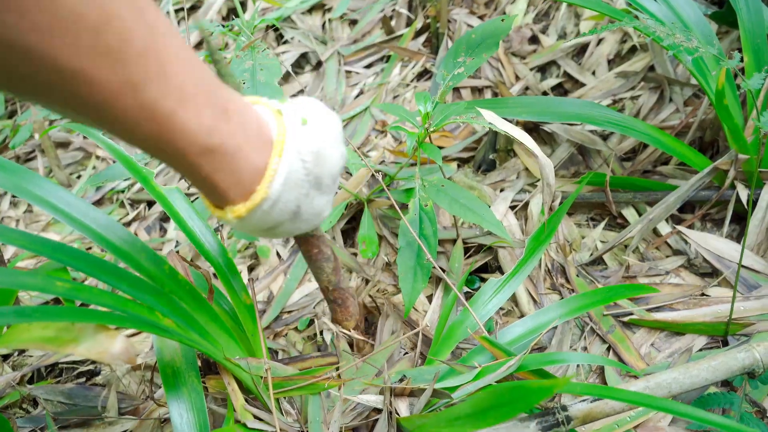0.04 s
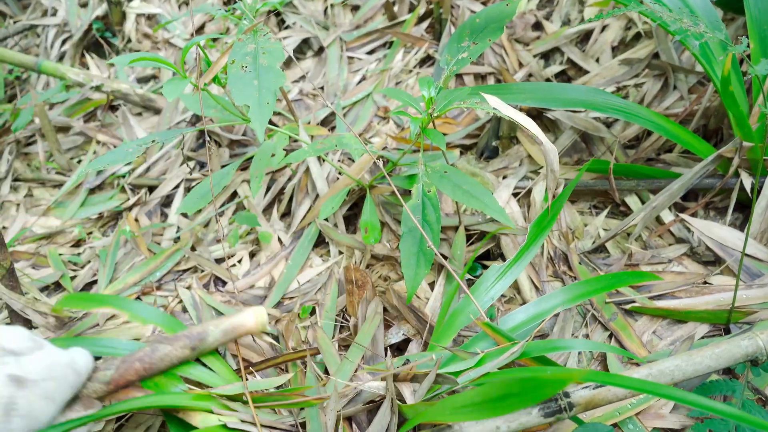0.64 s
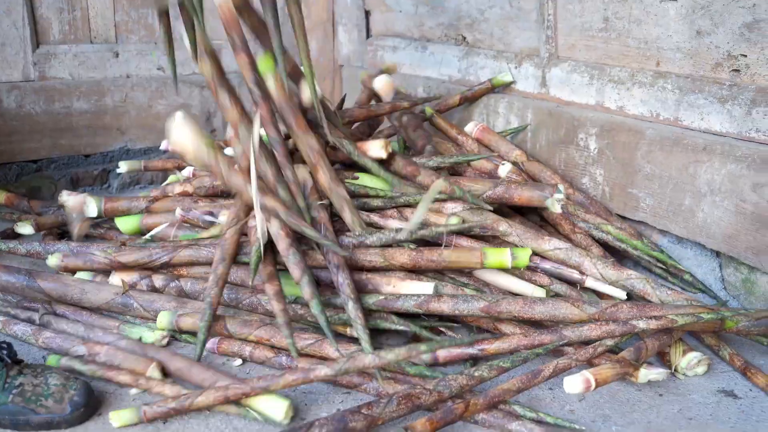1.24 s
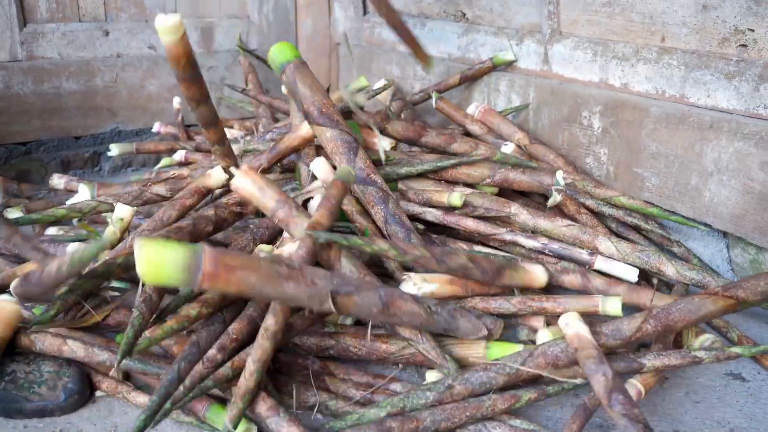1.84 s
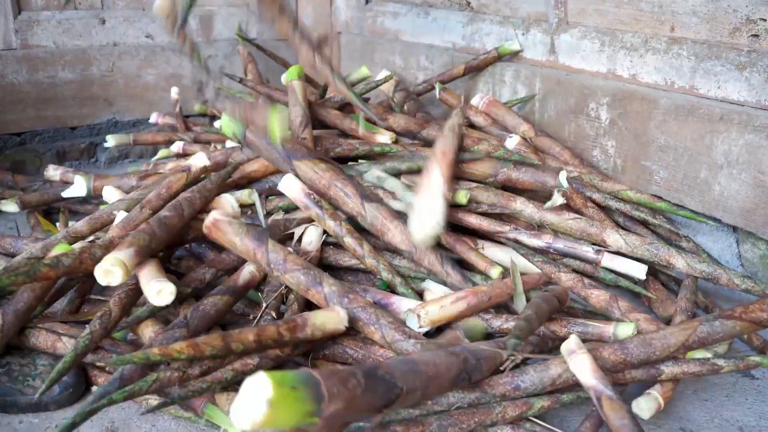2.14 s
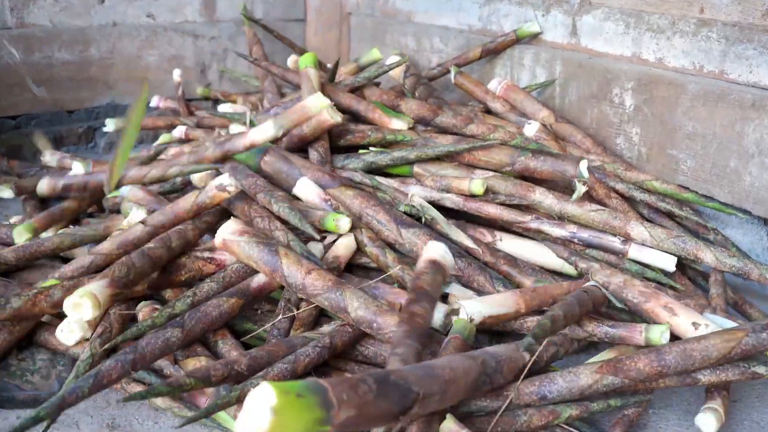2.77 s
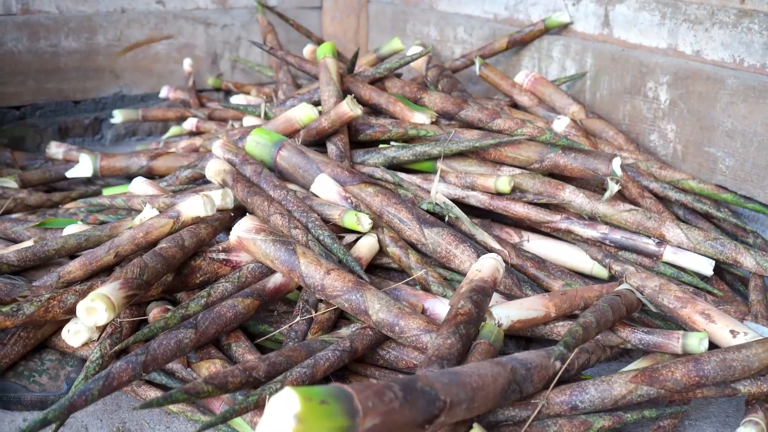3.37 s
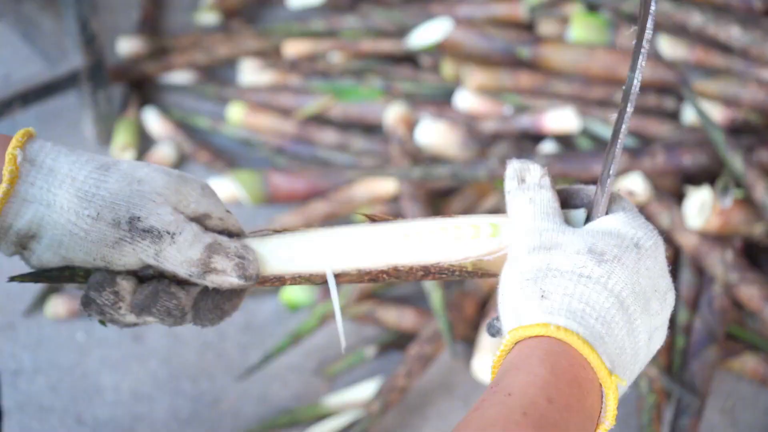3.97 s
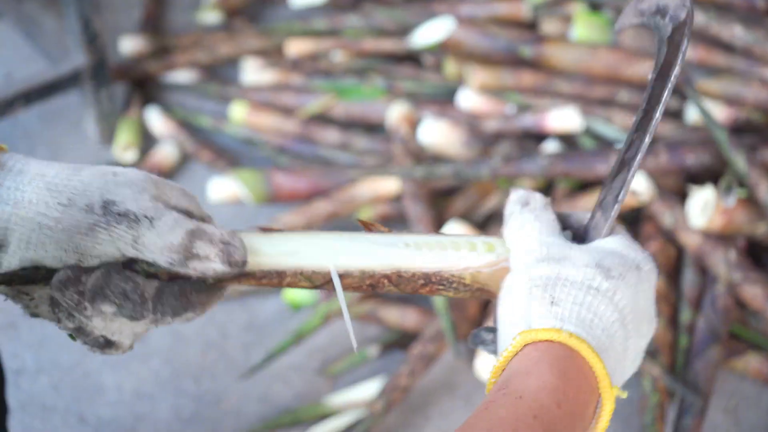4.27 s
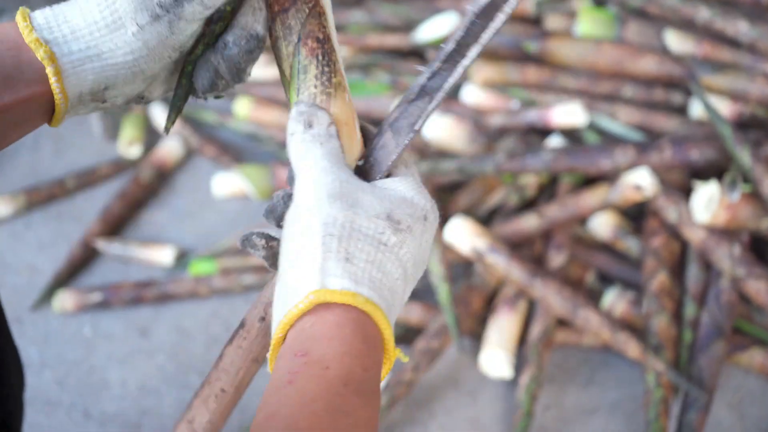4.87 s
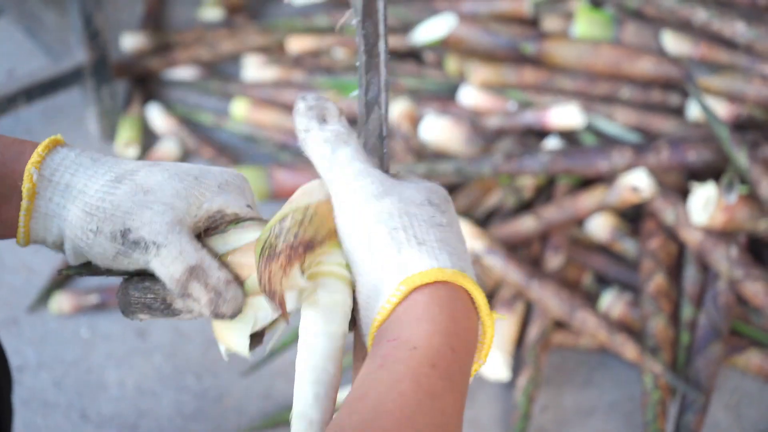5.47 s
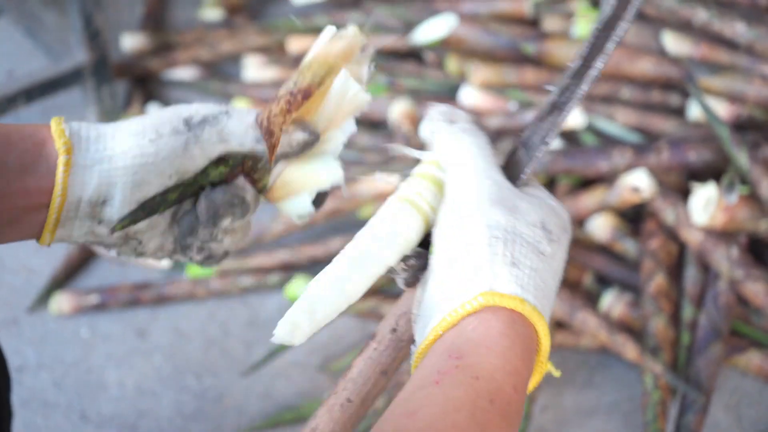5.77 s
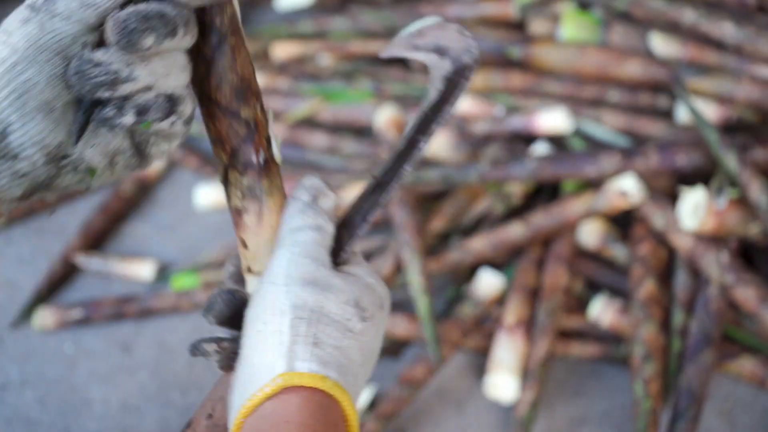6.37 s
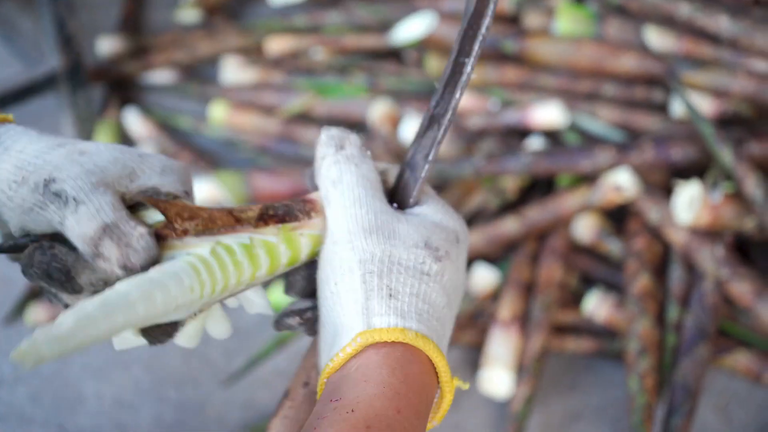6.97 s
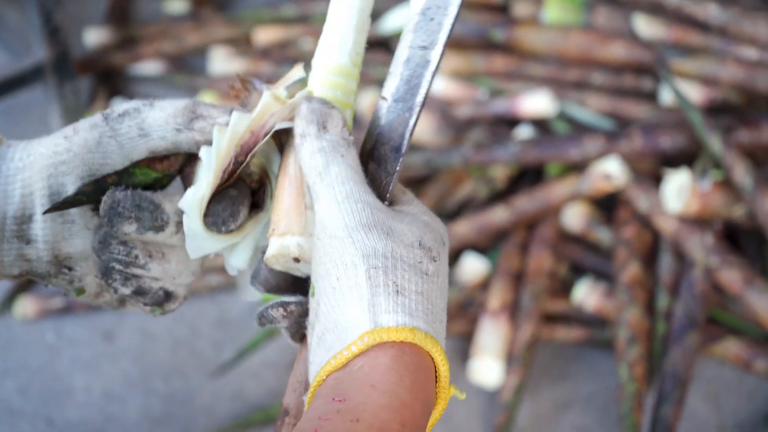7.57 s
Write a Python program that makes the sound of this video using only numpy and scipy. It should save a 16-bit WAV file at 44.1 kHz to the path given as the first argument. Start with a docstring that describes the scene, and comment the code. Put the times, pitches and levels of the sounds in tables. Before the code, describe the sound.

Close to the microphone outdoors, a young bamboo shoot cracks fibre by fibre, snaps free and brushes through dry leaves. Armfuls of shoots then tumble onto a pile with hollow knocks and rustling husks, settling into a few small clacks. Gloved hands then peel two shoots in turn, with dense sharp cracks, ripping and juicy crunches. Insects shrill faintly far away and air rumbles softly on the microphone.

```python
"""In a bamboo patch and a walled yard, shoots are harvested close to a mono microphone.
One is snapped off and brushes through dry leaves (0-1 s). Armfuls tumble onto a pile, hollow stems
knocking and husks rustling (1-4 s). Then gloved hands split the sheaths (the outer wrapping) and
rip them off, fibre by fibre. Insects shrill far away and moving air sways at the microphone."""
import sys
import numpy as np
from scipy import signal
from scipy.fft import rfft, irfft, next_fast_len
from scipy.io import wavfile
from scipy.ndimage import uniform_filter1d, map_coordinates

SR = 44100
rng = np.random.default_rng(int(sys.argv[2]) if len(sys.argv) > 2 else 0)


def persist_wave(psi):
    """Save psi, clipped to +-1, as 16-bit WAV."""
    counts = np.round(np.clip(psi, -1, 1) * 32767).astype(np.int16)
    wavfile.write(sys.argv[1], SR, np.atleast_2d(counts).T)


N = 340011

# How loud the insect chorus and the moving air are over time: time_s, level_db
CHORUS_LEVELS = [(1, -54), (2.9, -46.5), (3.97, -45.5), (3.99, -35.5), (4.3, -35.5), (5.55, -38.5),
                 (5.8, -37.5), (6.04, -37.5), (6.09, -39), (6.6, -37), (7.35, -42), (7.71, -41)]
AIR_LEVELS = [(0, -35.5), (6.3, -39), (7.71, -46)]
# A lower-pitched insect joins in: start_s, length_s
INSECT_CALLS = [(3.97, 0.21), (6.055, 0.11)]

# The shoot cracks at its foot: start_s, crack_db, flesh_db
SNAPS = [(0.0243, -21, -36), (0.0507, -14.5, -28), (0.1235, -22, -28.5), (0.1266, -8, -36),
         (0.1471, -13.5, -37), (0.1869, -17, -28), (0.1952, -13, -24), (0.2172, -18, -26.5),
         (0.2372, -11.5, -24.5), (0.251, -19, -32), (0.2613, -6, -17), (0.3302, -15.5, -38),
         (0.3448, -15, -23), (0.3507, -10, -26), (0.3595, -17.5, -25.5), (0.3708, -17, -40),
         (0.3777, -14.5, -21), (0.4115, -14, -24), (0.4175, -7.5, -14), (0.4551, -13, -21),
         (0.4795, -30, -17.5)]
# It brushes through dead leaves: start_s, length_s, crackle_db, crunch_db
BRUSHES = [(0.0, 0.05, -32.5, -36.5), (0.12, 0.24, -39.5, -43.5), (0.29, 0.075, -27, -45),
           (0.455, 0.037, -22.5, -32), (0.55, 0.38, -34, -38.5)]

# Armfuls pour onto the pile, and a few shoots slip: start_s, length_s, rustle_db, tumble_db
POURS = [(1.04, 0.27, -25.5, -27), (1.38, 0.28, -25, -28), (2.16, 0.19, -28.5, -29.5),
         (2.58, 0.016, -34, -31)]
SLIPS = [(0.975, 0.069, -32, -42), (1.935, 0.072, -31.5, -34), (2.04, 0.11, -30.5, -36.5),
         (3.048, 0.014, -37, -34), (3.66, 0.069, -40, -41.5), (3.762, 0.063, -37, -39)]
# Heavy shoots land: start_s, blow_db, ring_db, pitch_hz
KNOCKS = [(1.054, -30.5, -25, 2120), (1.089, -31, -20, 1300), (1.169, -31, -23.5, 2390),
          (1.252, -31.5, -26, 1510), (1.416, -28.5, -31, 970), (1.716, -31, -22.5, 2320),
          (1.844, -31.5, -42, 3460), (2.116, -29, -31, 2100), (2.173, -28, -45, 805),
          (2.204, -32, -31, 494), (2.228, -27.5, -31, 3040), (2.316, -30, -31, 920),
          (2.339, -28, -38, 1340), (2.46, -30, -28, 520), (2.68, -35, -40, 830), (2.772, -44, -48, 700),
          (2.95, -50, -43, 1200), (3.051, -33, -31, 895), (3.062, -31.5, -37, 1910),
          (3.152, -46, -50, 2470), (3.268, -44.5, -44, 4360), (3.395, -49.5, -50, 3900),
          (3.519, -54.5, -59, 395), (3.705, -41, -40, 700), (3.776, -34.5, -32, 564)]
# Hollow stems scrape down the pile and sing: start_s, length_s, level_db, pitch_hz
SCRAPES = [(1.082, .08, -23.5, 1320), (1.13, .13, -26, 1370)]

# A sheath splits: start_s, crack_db, flesh_db
SPLITS = [(4.2532, -29, -32.5), (4.32, -20.5, -33), (4.4507, -20, -36), (4.4664, -25, -46),
          (4.4953, -21, -37), (4.5435, -15.5, -15), (4.5504, -22, -24), (4.5727, -24, -13),
          (4.5961, -23, -27), (4.6221, -15, -22), (4.6334, -17, -33), (4.6423, -9, -16), (4.7299, -22, -47),
          (4.8092, -22, -18), (4.8894, -19, -12), (4.9685, -11, -13), (5.0275, -12.5, -18.5),
          (5.0725, -19, -19), (5.1292, -24, -13.5), (5.1848, -12, -18), (5.2185, -17, -24),
          (5.3005, -21.5, -23), (5.319, -16, -19), (5.3615, -15.5, -14.5), (5.3826, -18, -12.5),
          (5.4455, -26, -18.5), (5.5221, -29, -32), (5.536, -25, -32.5), (5.6282, -23, -38),
          (5.6473, -21.5, -32), (5.7055, -28, -29), (5.7406, -27, -29), (6.1707, -18.5, -54),
          (6.1784, -17.5, -22), (6.1947, -20, -46), (6.2348, -20, -26), (6.2486, -14, -25),
          (6.2607, -11, -38), (6.2764, -25, -43), (6.309, -18, -23.5), (6.3292, -14, -26),
          (6.3492, -19.5, -37), (6.475, -22.5, -35), (6.5038, -15.5, -17.5), (6.5472, -20.5, -34),
          (6.5693, -23, -24), (6.8186, -16, -11), (6.8693, -15.5, -18), (6.9062, -21, -21),
          (6.9245, -14, -13.5), (6.9785, -16.5, -28), (7.0343, -14, -15), (7.051, -15, -14.5),
          (7.0635, -16.5, -18.5), (7.0962, -16, -26), (7.1143, -21, -31), (7.1214, -20, -27),
          (7.1591, -25, -22.5), (7.1852, -8.5, -19), (7.2085, -15, -31), (7.2473, -14, -37),
          (7.2656, -17, -25), (7.2996, -15, -28), (7.3092, -21.5, -32), (7.3691, -17.5, -33),
          (7.3834, -17.5, -29), (7.4135, -22, -38), (7.4412, -22.5, -47), (7.5089, -25.5, -51),
          (7.6141, -16.5, -38), (7.6236, -16.5, -36)]
# One pull of the hand tears fibres: start_s, length_s, crackle_db, crunch_db
PULLS = [(4.512, 0.18, -24, -28.5), (4.73, 0.14, -25.5, -33.5), (4.885, 0.25, -25, -27),
         (5.18, 0.15, -29, -28), (5.355, 0.054, -22, -28), (6.232, 0.055, -27, -36),
         (6.308, 0.051, -24, -32), (6.4, 0.14, -34, -36.5), (6.503, 0.12, -27, -28),
         (6.735, 0.082, -34.5, -38.5), (6.818, 0.079, -26.5, -27.5), (6.91, .1, -25, -27.5),
         (7.045, 0.02, -24, -29.5), (7.185, 0.1, -26.5, -35)]
# The gloves slide without tearing anything: start_s, length_s, level_db
RUBS = [(4.322, 0.018, -33), (4.36, 0.15, -45), (5.52, 0.22, -38.5), (5.742, 0.023, -35), (5.915, .13, -40),
        (6.11, 0.088, -40.5), (7.37, 0.089, -37.5), (7.612, 0.013, -36.5)]
# The soft core gives way: start_s, level_db, pitch_hz
THUDS = [(4.542, -19.5, 423), (4.641, -28, 292), (4.89, -29, 340), (5.073, -30.5, 336), (5.132, -25.5, 423),
         (5.755, -35, 290), (6.236, -32.5, 480), (7.096, -36.5, 270)]

# Each tone below says how strong the low and high parts of a sound are: frequency_hz, relative_db
# Far insects, outdoor hush and rumbling air
CHORUS_TONE = [(4000, -32), (5400, -16), (5950, -4), (6350, -1.5), (7150, -8), (7900, -26), (10000, -58)]
HUSH_TONE = [(40, 3.5), (300, -4.5), (1400, -9), (3000, -16.5), (15500, -12.5)]
AIR_TONE = [(10, -6), (27, -11.5), (38, -28), (70, -33), (200, -60)]
# Crisp dead leaves and the duller crunch beneath them
LEAF_TONE = [(1200, -15), (3000, -6.5), (6000, -2), (9000, -3.5), (15500, -6.5)]
SOIL_TONE = [(55, -3.5), (300, -3), (1800, 1), (2500, -2), (5000, -12.5)]
# Rubbing husks, the whole pile tumbling, a few shoots slipping and single clacks
HUSK_TONE = [(1200, -1.5), (3500, 3), (8000, 5), (15500, 2.5)]
TUMBLE_TONE = [(40, -20), (70, -1.5), (150, -2.5), (300, -4), (550, -4), (1350, -2.5), (2200, -5.5),
               (4500, -25)]
SLIP_TONE = [(90, -10), (280, -1.5), (800, -3), (1600, 2), (4500, -19)]
CLACK_TONE = [(300, -10.5), (1000, 2), (3500, -6.5), (7000, -8), (15000, -23)]
# Sliding gloves, tearing sheaths and the bodies of the two peeled shoots
GLOVE_TONE = [(200, -22), (900, -3.5), (2500, -0.5), (5000, 1), (11000, 0), (15500, -10.5)]
SHEATH_TONE = [(150, -26), (500, -9), (1200, -9), (2600, -5), (4200, 3), (7500, 2), (15500, -0.5)]
FIRST_STEM_TONE = [(100, -22.5), (500, -10), (950, -0.5), (1250, 0), (1650, -6), (2350, 0), (4200, -5.5),
                   (8000, -41.5)]
SECOND_STEM_TONE = [(100, -61), (400, -19.5), (750, -5), (1150, -1), (1600, -1), (2200, 3.5), (3500, 1.5),
                    (7000, -15.5)]


def amp(db):
    """Turn decibels into a gain, the number to multiply a sound by."""
    return 10 ** (np.asarray(db) / 20)


def unit(x):
    """Scale a sound to an average (rms) level of 1."""
    return x / np.sqrt(np.mean(x ** 2) + 1e-20)


def add(track, start_s, sound):
    """Mix a sound into the track at the given time."""
    room_left = track[max(round(start_s * SR), 0):][:len(sound)]
    room_left += sound[:len(room_left)]


def sized(sound, db, span_s):
    """Give a short sound the energy of that level held for span_s."""
    return amp(db) * sound / np.sqrt(np.sum(sound ** 2) / (span_s * SR))


def levels(rows):
    """A gain that glides from row to row, silent outside them."""
    time_s, level_db = np.transpose(rows)
    return amp(np.interp(np.arange(N) / SR, time_s, level_db, left=-120, right=-120))


def gestures(rows, attack_s, sag_db_per_s, fall_db_per_s):
    """A gain curve for each dB column: a movement sets in, sags while it lasts, then dies away."""
    t = np.arange(0, N, 32) / SR
    starts, lengths, *columns = np.transpose(rows)[:, :, None]
    age = t - starts
    drop_db = sag_db_per_s * np.clip(age, 0, lengths) + fall_db_per_s * np.maximum(age - lengths, 0)
    shape = np.clip(age / attack_s, 0, 1) * amp(-drop_db)
    return [np.interp(np.arange(N) / SR, t, np.linalg.norm(amp(db) * shape, axis=0)) for db in columns]


def wobble(rate):
    """A smooth random curve with rate new values a second."""
    values = rng.standard_normal(int(N * rate / SR) + 4)
    return map_coordinates(values, [np.arange(N) * rate / SR], order=2)


def colour(x, tone):
    """Filter a sound with a tone table; white noise keeps its power."""
    size = 8192
    hz, db = np.transpose(tone)
    gain = unit(amp(np.interp(np.log(np.fft.rfftfreq(size, 1 / SR) + 1), np.log(hz), db)))
    # Minimum phase: the filter rings after a click, never before it.
    cepstrum = irfft(np.log(gain))
    cepstrum[1:size // 2] *= 2
    cepstrum[size // 2 + 1:] = 0
    return signal.fftconvolve(x, irfft(np.exp(rfft(cepstrum))))[:N]


def noise(tone):
    """Steady noise with the given tone, at level 1."""
    return unit(colour(rng.standard_normal(N), tone))


def resonate(x, hz, q):
    """Make a sound ring at one pitch; a higher q rings longer."""
    return signal.lfilter(*signal.iirpeak(min(hz, SR / 3), max(q, 1 / 2), SR), x)


def burst(t60, scatter):
    """A break or hit: one click, then a shower of smaller ones that fades 60 dB in t60 seconds."""
    t = np.arange(SR // 10) / SR
    shower = rng.laplace(size=len(t)) * amp(-60 * t / t60)
    return (t == 0) + scatter * shower / np.linalg.norm(shower)


def ticks(rate, spread_db):
    """Scattered clicks of uneven size, rate a second."""
    when, size = rng.random((int(rate * N / SR), 2)).T
    heights = amp(spread_db * (size - 1)) * rng.choice([-1, 1], len(size))
    return np.bincount((when * N).astype(int), heights, N)[:N]


def grains(tone, rate, spread_db, band_hz, cycles, hiss, clump_db):
    """Tiny contacts, rate a second, each ringing briefly; the overall level is held near 1."""
    low_hz, high_hz = band_hz
    when, pitch, size = rng.random((int(rate * N / SR), 3)).T
    hz = low_hz * (high_hz / low_hz) ** pitch
    turns = hz[:, None] * np.arange(min(int(cycles * SR / low_hz), SR // 40)) / SR
    # Most grains are faint and a few are strong; high ones are shorter, so they peak higher.
    strength = amp(spread_db * np.minimum(-np.log(1 - size), 4)) * hz ** 0.62
    rings = strength[:, None] * amp(-60 * turns / cycles) * np.sin(2 * np.pi * turns)
    index = (when * N).astype(int)[:, None] + np.arange(turns.shape[1])
    contacts = unit(np.bincount(index.ravel(), rings.ravel(), N)[:N])
    # A rubbing hiss joins the grains, and both come in clumps.
    rubbing = hiss * rng.standard_normal(N)
    texture = colour((contacts + rubbing) * amp(clump_db * wobble(140)), tone)
    return texture / np.sqrt(np.abs(uniform_filter1d(texture ** 2, SR // 30)) + 1e-12)


def echoes(x, t60, echo_db):
    """Add a short blur of echoes from the ground and walls."""
    t = np.arange(SR // 3) / SR
    tail = rng.standard_normal(len(t)) * amp(-60 * t / t60) * (1 - np.exp(-t / 0.0013))
    return x + amp(echo_db) * signal.fftconvolve(x, tail / np.linalg.norm(tail))[:N]


def insects():
    """A far chorus flutters and swells, and a lower-pitched insect calls twice."""
    chorus = levels(CHORUS_LEVELS) * noise(CHORUS_TONE) * amp(0.75 * wobble(90) + 0.84 * wobble(9))
    for start_s, length_s in INSECT_CALLS:
        hiss = rng.standard_normal(int(length_s * SR))
        call = unit(resonate(resonate(hiss, hz=4900, q=12), hz=4900, q=12))
        add(chorus, start_s, amp(-47) * call * signal.windows.tukey(len(call)))
    return chorus


def outdoor_air():
    """A steady hush, and the low rumble of air moving at the microphone."""
    return amp(-49) * noise(HUSH_TONE) + levels(AIR_LEVELS) * noise(AIR_TONE)


def fractures(rows, base_hz, q, crack_t60, flesh_t60, scatter, span_s, splinter, stem_hz):
    """Each break is a bright crack of dry fibres and a jolt to the juicy stem beneath."""
    octaves_per_db, rise_s, lead_s = 0.022, 0.00043, 0.012
    cracks, jolts = np.zeros(N), np.zeros(N)
    for start_s, crack_db, flesh_db in rows:
        # A dry crack that spares the flesh is brighter.
        hz = base_hz * 2 ** (octaves_per_db * (crack_db - flesh_db))
        force = burst(crack_t60, scatter)
        # The split takes a moment to run across the fibres.
        force *= 1 - np.exp(-np.arange(len(force)) / SR / rise_s) / 2
        # The freed splinter rings at a pitch of its own.
        twang = resonate(force, hz * np.exp(rng.normal(-0.1, 0.25)), q=3.5)
        crack = resonate(resonate(force, hz, q) + splinter * twang, hz, q=0.5)
        add(cracks, start_s, sized(crack, crack_db, span_s))
        # Three fibres give way just before the break.
        for early in rng.random(size=3):
            fibre = resonate(burst(crack_t60, scatter), hz, q)
            add(cracks, start_s - lead_s * early, sized(fibre, crack_db - 17.5, span_s) * (1 - early))
        # Each jolt hits another spot, so its hollow ring has its own pitch.
        jolt = sized(burst(flesh_t60, scatter), flesh_db, span_s)
        hollow = resonate(jolt, stem_hz * 2 ** (0.42 * rng.normal()), q=3)
        add(jolts, start_s, amp(-2) * (jolt + hollow))
    return cracks, jolts


def picking():
    """The stem cracks fibre by fibre, comes free and brushes through dead leaves."""
    crackle, crunch = gestures(BRUSHES, attack_s=0.0032, sag_db_per_s=12.5, fall_db_per_s=121)
    cracks, jolts = fractures(SNAPS, base_hz=7104, q=0.79, crack_t60=0.0054, flesh_t60=0.018,
                              scatter=1.15, span_s=0.0058, splinter=2.1, stem_hz=2100)
    leaves = crackle * grains(LEAF_TONE, rate=1400, spread_db=1, band_hz=(2540, 15100),
                              cycles=6.6, hiss=1, clump_db=2)
    soil = crunch * grains(SOIL_TONE, rate=770, spread_db=0.5, band_hz=(307, 2490),
                           cycles=9.2, hiss=1, clump_db=2.5)
    return echoes(cracks + colour(jolts, SOIL_TONE) + leaves + soil, t60=0.094, echo_db=-14.5)


def knocks_and_scrapes():
    """Dry husks slap the pile, and hollow stems ring as they land or scrape down it."""
    track = np.zeros(N)
    for start_s, blow_db, ring_db, hz in KNOCKS:
        slap = colour(burst(t60=0.045, scatter=4.8), HUSK_TONE)
        blow = resonate(burst(t60=0.045, scatter=2.4), hz, q=0.5)
        add(track, start_s, sized(slap, blow_db, span_s=0.012))
        add(track, start_s, sized(blow, blow_db, span_s=0.054))
        add(track, start_s, sized(resonate(blow, hz, q=14), ring_db, span_s=0.008))
    for start_s, length_s, db, hz in SCRAPES:
        scrape = unit(resonate(rng.laplace(size=int(length_s * SR)), hz, q=11))
        add(track, start_s, amp(db) * scrape * np.sqrt(np.linspace(1, 0, len(scrape))))
    return track


def piling():
    """Tumbling stems hit at once and soon lie still; their husks slide later and for longer."""
    pour, _ = gestures(POURS, attack_s=0.027, sag_db_per_s=-1.5, fall_db_per_s=26.5)
    _, tumble = gestures(POURS, attack_s=0.009, sag_db_per_s=7.5, fall_db_per_s=52)
    slide, roll = gestures(SLIPS, attack_s=0.0039, sag_db_per_s=16, fall_db_per_s=225)
    rustle = np.hypot(pour, slide)
    knocks = knocks_and_scrapes()
    husks = rustle * grains(HUSK_TONE, rate=2500, spread_db=3, band_hz=(2200, 15200),
                            cycles=2.7, hiss=1.18, clump_db=1.6)
    stems = tumble * grains(TUMBLE_TONE, rate=1200, spread_db=2, band_hz=(115, 2620),
                            cycles=11.2, hiss=1, clump_db=2)
    # A few slipping shoots are too light to shake the whole pile.
    stems += roll * grains(SLIP_TONE, rate=600, spread_db=2.5, band_hz=(201, 2820),
                           cycles=7.2, hiss=1, clump_db=4)
    # Single shoots clack against their neighbours as the pile moves.
    bumps = signal.fftconvolve(ticks(rate=20, spread_db=24), burst(t60=0.014, scatter=2.2))[:N]
    clacks = rustle * colour(bumps, CLACK_TONE)
    return echoes(knocks + amp(1.5) * husks + stems + amp(19.5) * clacks, t60=0.12, echo_db=-12)


def glove_rubs():
    """Gloves slide along the sheath with a grainy hiss."""
    rub, = gestures(RUBS, attack_s=0.0057, sag_db_per_s=0, fall_db_per_s=230)
    return rub * grains(GLOVE_TONE, rate=1500, spread_db=2, band_hz=(1200, 15000),
                        cycles=4.3, hiss=1.1, clump_db=3.5)


def tearing_fibres():
    """Fine fibres break in a dense run, with a thicker bundle letting go now and then."""
    fine = grains(SHEATH_TONE, rate=2200, spread_db=2.5, band_hz=(1800, 15200),
                  cycles=8.1, hiss=0.57, clump_db=3.5)
    bundles = signal.fftconvolve(ticks(rate=67, spread_db=16), burst(t60=0.0033, scatter=1.4))[:N]
    return fine + amp(23) * colour(bundles, SHEATH_TONE)


def core_thuds():
    """The soft core gives way with dull thuds."""
    track = np.zeros(N)
    for start_s, db, hz in THUDS:
        thud = resonate(burst(t60=0.011, scatter=0.76), hz, q=0.64)
        add(track, start_s, sized(resonate(thud, hz, q=0.46), db, span_s=0.01))
    return track


def peeling(grip_from_s=3.98, second_shoot_s=6.05):
    """Two shoots in turn are wrung out of their sheaths; splits and tears make each stem ring."""
    t = np.arange(N) / SR
    # Between pulls the gripped sheath keeps up a faint crackle and a fainter crunch.
    grip = np.outer(amp([-52.5, -64]), t > grip_from_s)
    pulls = gestures(PULLS, attack_s=0.0079, sag_db_per_s=11, fall_db_per_s=206)
    crackle, crunch = np.hypot(grip, pulls)
    cracks, jolts = fractures(SPLITS, base_hz=5430, q=0.55, crack_t60=0.0035, flesh_t60=0.019,
                              scatter=1.3, span_s=0.0055, splinter=1.1, stem_hz=1260)
    sound = cracks + glove_rubs() + crackle * tearing_fibres()
    first = t < second_shoot_s
    for held, stem_tone in (first, FIRST_STEM_TONE), (~first, SECOND_STEM_TONE):
        flesh = crunch * grains(stem_tone, rate=1100, spread_db=2, band_hz=(630, 3630),
                                cycles=5.2, hiss=0.65, clump_db=5.5)
        sound += held * (colour(jolts, stem_tone) + flesh)
    return echoes(sound + core_thuds(), t60=0.1, echo_db=-11)


def scene():
    """All sources reach both channels alike."""
    mono = picking() + piling() + peeling() + insects() + outdoor_air()
    return np.array([mono, mono])


def record(dry):
    """Round off the loudest cracks and cut the very highest treble."""
    ceiling, top_hz = 0.85, 15750
    limited = dry / (1 + np.abs(dry / ceiling) ** 6) ** (1 / 6)
    size = next_fast_len(N + SR // 10)
    passband = 1 / (1 + (np.fft.rfftfreq(size, 1 / SR) / top_hz) ** 200)
    return irfft(rfft(limited, size) * passband, size)[:, :N]


dry = scene()
out = record(dry)
persist_wave(out)
```